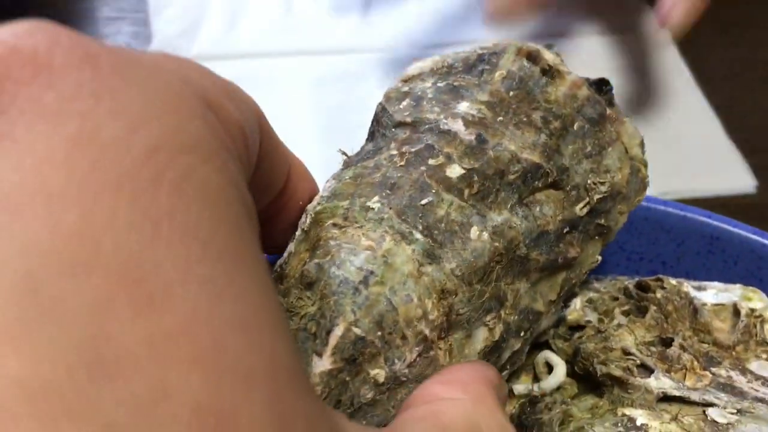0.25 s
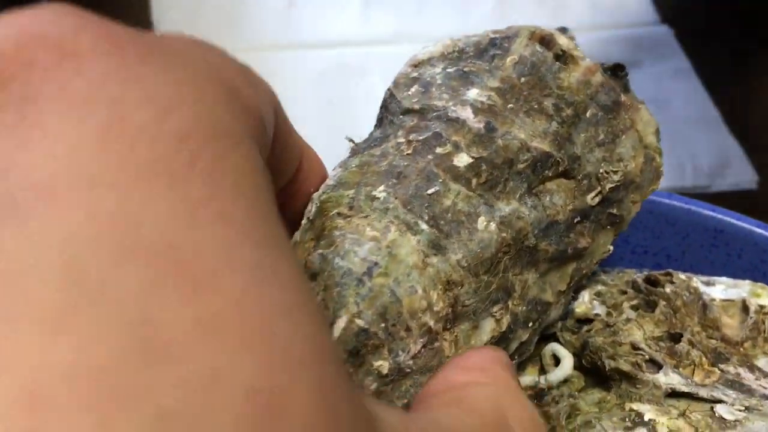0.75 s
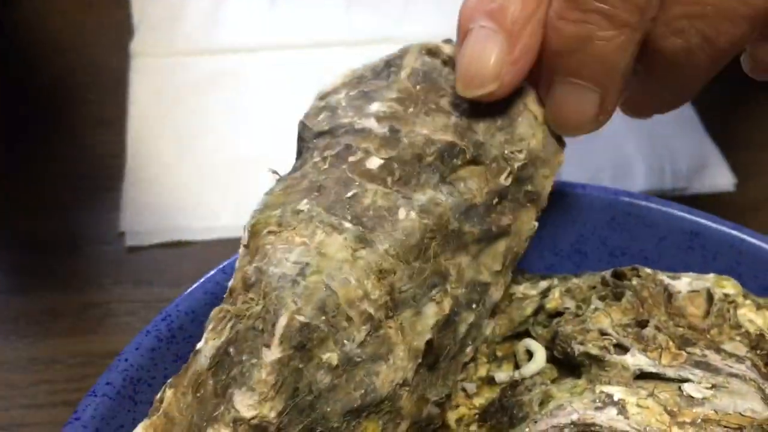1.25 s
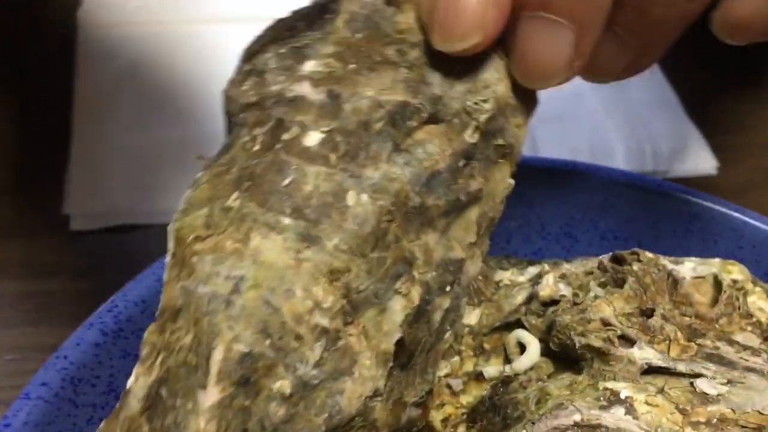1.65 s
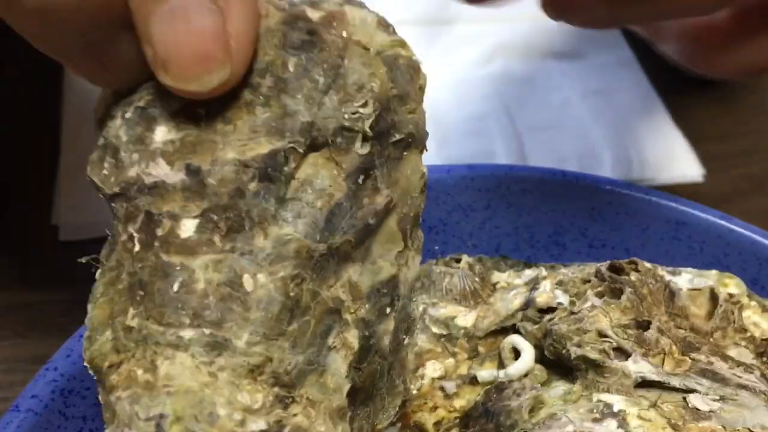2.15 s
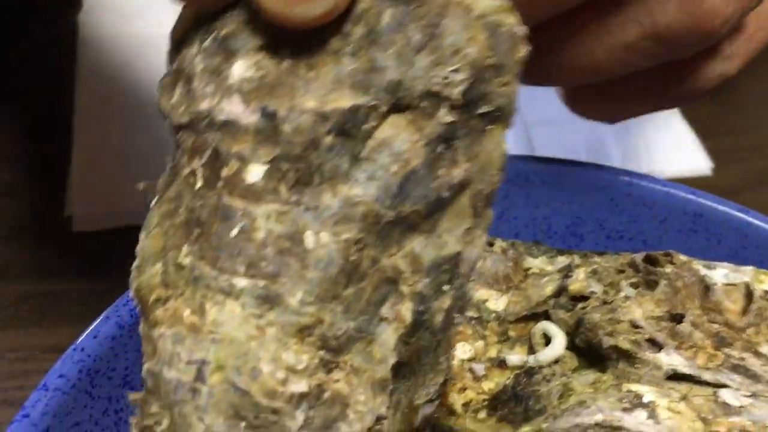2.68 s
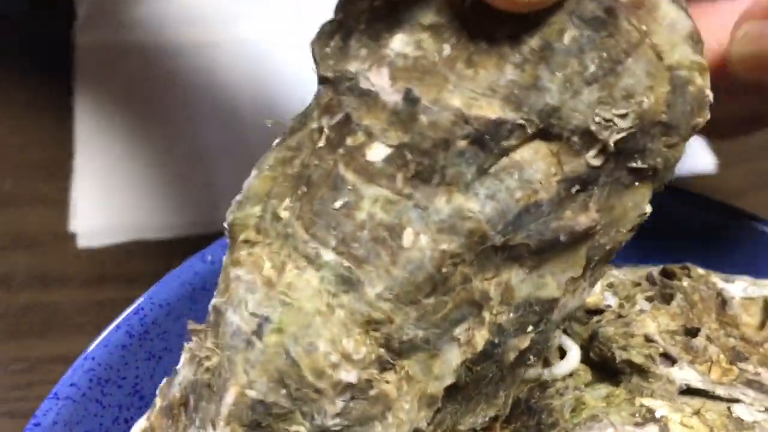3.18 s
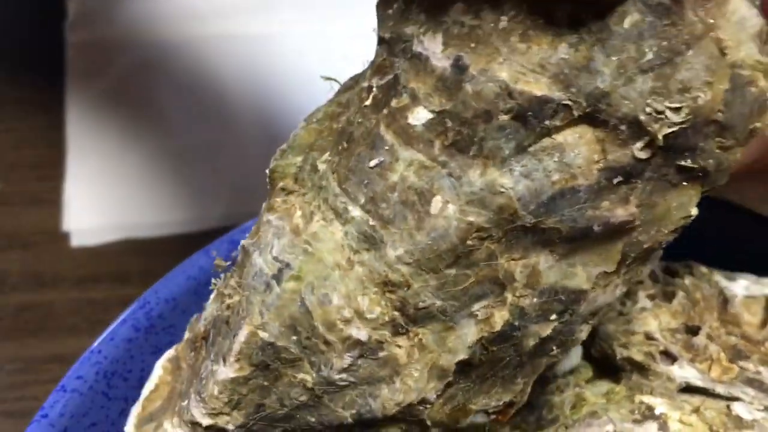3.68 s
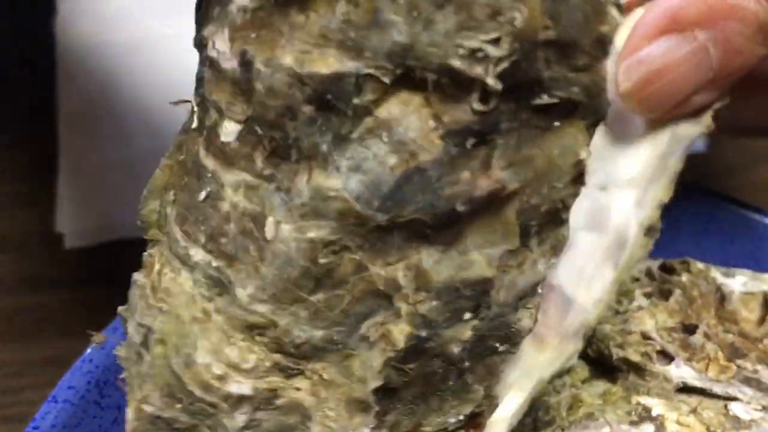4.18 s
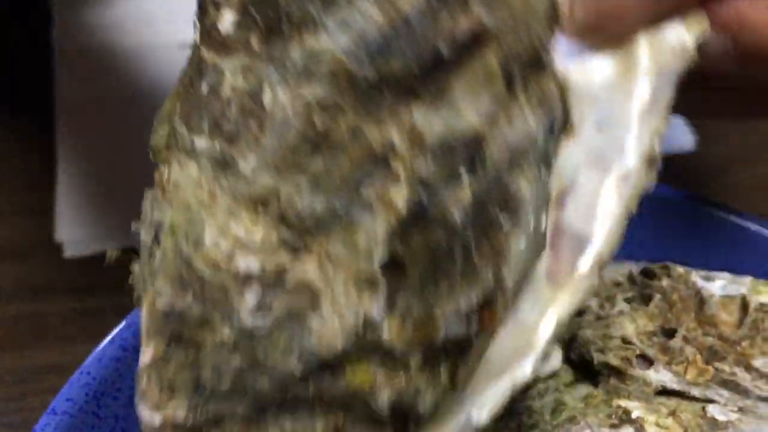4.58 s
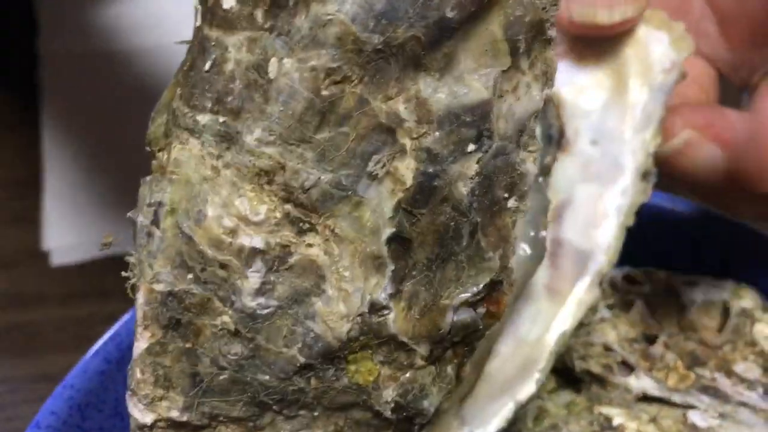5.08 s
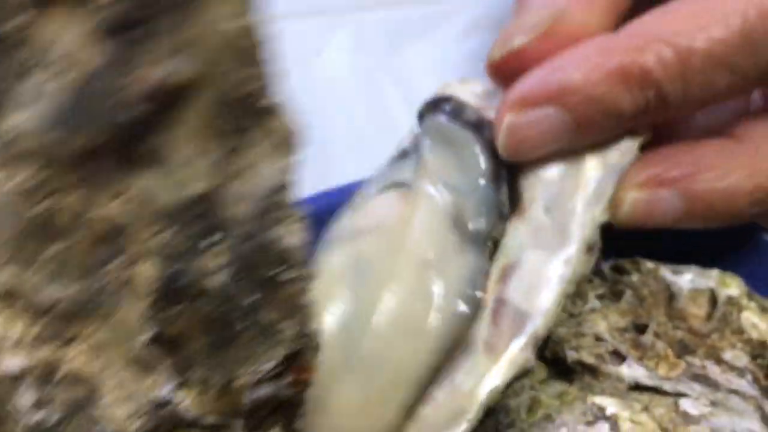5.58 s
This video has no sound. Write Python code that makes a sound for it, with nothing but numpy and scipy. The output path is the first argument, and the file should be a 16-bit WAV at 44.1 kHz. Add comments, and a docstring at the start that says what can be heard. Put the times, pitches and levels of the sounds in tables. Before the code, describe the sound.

Close, dry clacks and scratchy scrapes of heavy oyster shells, with sharp flaky clicks and soft wooden table thuds in a small quiet room.

```python
"""Prying an oyster on a plate

Hands turn and pry a large oyster that rests on other shells in a glazed plate, close to a small microphone.
The thick shell knocks dully (short dying tones), flakes of its rim tick (tone and noise bursts), and grit
scrapes (random tiny slips). The plate sings thinly and the wooden table answers with low thuds,
over a hand brushing paper (filtered noise that stops early) and the hush of a small room (steady noise)."""
import sys
import numpy as np
from scipy import signal
from scipy.fft import rfft, irfft, next_fast_len
from scipy.io import wavfile
from scipy.ndimage import uniform_filter1d

SR = 44100
rng = np.random.default_rng(int(sys.argv[2]) if len(sys.argv) > 2 else 0)


def to_wav(sig):
    """Store sig (one row per channel, or 1-D mono) as 16-bit WAV at the path in sys.argv[1].

    Samples outside -1..1 are clipped; the rate is SR.
    """
    pcm = np.clip(np.atleast_2d(sig), -1, 1) * 32767
    pcm = np.round(pcm).astype(np.int16)
    wavfile.write(sys.argv[1], SR, pcm.T)  # frames by channels


N = 257588  # length in samples

# Modes are the tones a body rings at. Columns: f/Hz, relative level/dB, time to fall by 60 dB/s
# the thick shell
SHELL_MODES = [(750, -2, 0.0061), (985, 7.5, 0.0099), (1140, 8.5, 0.009), (1523, 5.5, 0.015),
               (1839, 5.5, 0.012), (2355, -5, 0.022), (2903, -3, 0.0027), (4130, 1.5, 0.0062)]
# the glazed plate, same columns: f/Hz, relative level/dB, time to fall by 60 dB/s
PLATE_MODES = [(1955, -3, .05), (3590, -6, .08), (5075, -4, .05), (6750, -9, .06), (8670, -9, .05),
               (9910, -14, .06), (10820, -17, .09), (11890, -15, .06)]
# the wooden table top, same columns: f/Hz, relative level/dB, time to fall by 60 dB/s
TABLE_MODES = [(138, -1, 0.093), (192, -1, 0.075), (239.3, 13.5, 0.03), (283.5, 5, 0.044),
               (328.3, 1, 0.056)]

# fall in dB per octave squared above and below the struck spot's pitch, and its limit in dB
ABOVE_DB, BELOW_DB, FARTHEST_DB = 68, 25.5, 10.5
KNOCK_T60, SCRAPE_T60 = .015, .024  # s, ring time of the mode nearest the touched spot
HUSH_DB = -60  # average (rms) level
WIPE_END_S, WIPE_DB = 0.218, -61  # when the hand lifts, and the average level of its hiss
PUSH_HZ, PUSH_SPREAD = 203, 0.37  # pitch of a push on the table and its scatter in octaves
LOAD_DB, LOAD_SLOPE = -62, 0.84  # table drive in dB at -65 dB of drag, and dB gained per dB of drag
BITE_S, LET_GO_S = 0.0045, 0.014  # scrapes bite quickly and let go more slowly
FLUTTER_DB, FLUTTER_S = 3.5, 0.025  # rubbing flutters by this much, averaged over this time
GLAZE_DB = -19.5  # how much of the grit sets the plate singing
SPOT_S, SPOT_SHIFT = 0.05, .07  # time the grit stays on one spot of the rim, pitch scatter in octaves
# faint noise swelling just before each tick: level against its peak, time to rise 60 dB
LEAD_DB, LEAD_S = -14, .018
EDGE_HZ = 16300  # upper limit of the microphone's band


def gain_of(db):
    """Turns decibels into amplitude."""
    return 10 ** (np.asarray(db) / 20)


def evened(x):
    """Scales to an average (rms) level of 1."""
    return x / np.sqrt(np.mean(x ** 2) + 1e-20)


def peaked(x):
    """Scales to peak 1."""
    return x / (abs(x).max() + 1e-20)


def unit(x):
    """Scales a response to energy 1."""
    return x / np.linalg.norm(x)


def add(mix, s, sound):
    """Mixes a sound in at s seconds, or at the very start if s is negative."""
    part = mix[max(round(s * SR), 0):][:len(sound)]
    part += sound[:len(part)]


def filtered(x, order, hz, kind):
    """Passes x through a smooth filter that keeps only the high or band part."""
    return signal.sosfilt(signal.butter(order, hz, kind, fs=SR, output="sos"), x)


def coloured(x, points):
    """Shapes the spectrum of x by joining (Hz, dB) points with lines."""
    hz, db = np.transpose(points)
    size = next_fast_len(len(x))
    curve = np.interp(np.log(np.fft.rfftfreq(size, 1 / SR) + 1), np.log(hz + 1), db)
    return irfft(rfft(x, size) * gain_of(curve), size)[:len(x)]


def wander(smooth_s):
    """Random curve, averaged over smooth_s seconds and scaled to rms 1."""
    return evened(uniform_filter1d(rng.standard_normal(N), max(round(smooth_s * SR), 2)))


def ring(modes, extra_db=0, detune=1, rise_s=0.00016, count=6000):
    """A body struck once: a sum of sine tones that each die away exponentially."""
    hz, db, t60 = np.transpose(modes)[:, :, None]
    t = np.arange(count) / SR
    level = gain_of(db + np.reshape(extra_db, (-1, 1)) - 60 * t / t60)
    tones = level * np.sin(2 * np.pi * hz * np.reshape(detune, (-1, 1)) * t)
    return tones.sum(0) * (1 - np.exp(-t / rise_s))


def slips(per_s, spread_db, clump_s):
    """Rough surfaces stick and slip: random impulses of uneven size that come in clumps."""
    clumps = wander(clump_s)
    size = gain_of(spread_db * np.minimum(rng.exponential(1, N), 4)) * rng.choice([-1., 1.], N)
    return size * (rng.random(N) < per_s / SR * np.exp(.7 * clumps))


def near(spot_hz):
    """Shell modes weaken away from the favoured pitch, faster above it as the contact is blunt."""
    octaves = np.log2(np.transpose(SHELL_MODES)[0] / spot_hz)
    fall_db = np.where(octaves > 0, ABOVE_DB, BELOW_DB) * octaves ** 2
    return -np.minimum(fall_db, FARTHEST_DB)


def at_spot(spot_hz, spot_t60):
    """Shell modes excited at one spot: the nearest takes its pitch and ring time, the others weaken."""
    hz, db, t60 = np.transpose(SHELL_MODES)
    near_db = near(spot_hz)
    nearest = near_db == near_db.max()
    return np.transpose([np.where(nearest, spot_hz, hz), db + near_db, np.where(nearest, spot_t60, t60)])


def room_hush():
    """The hush of a small room: steady noise with a shaped spectrum."""
    # spectrum of the hush: f/Hz, relative level per Hz/dB
    hush_points = [(20, -3.5), (124, 5), (440, -15), (1350, -20), (1900, -16), (2890, -24), (4410, -24.5),
                   (13200, -28.5), (15600, -31), (16500, -72.5)]
    return gain_of(HUSH_DB) * evened(coloured(rng.standard_normal(N), hush_points))


def room(x):
    """Walls send back a short tail of sparse random echoes whose treble dies sooner."""
    t = np.arange(8000) / SR
    taps = rng.choice([-1., 1.], len(t)) * (rng.random(len(t)) < 2500 / SR) * (t > .003)
    dull = signal.lfilter([.3], [1, -.7], taps)
    bright = taps - dull
    tail = dull * gain_of(-60 * t / 0.16) + bright * gain_of(-60 * t / 0.13)
    return signal.oaconvolve(x, unit(tail))[:N]


def wipe():
    """A hand slides over a paper towel: a smooth wide hiss that stops as the hand lifts."""
    hiss = filtered(rng.standard_normal(N), 1, [900, 9000], "band")
    lift = np.clip((WIPE_END_S - np.arange(N) / SR) / 0.0095 + .5, 0, 1)
    return gain_of(WIPE_DB) * evened(hiss) * lift


def bumps():
    """A hand bumps the table, whose top swings softly at one low pitch."""
    # bumps: t/s, peak level/dB, f/Hz, time to fall by 60 dB/s
    bump_rows = [(0.757, -37, 69, 0.11), (4.672, -36, 63.6, 0.049)]
    out = np.zeros(N)
    for s, db, hz, t60 in bump_rows:
        add(out, s, gain_of(db) * peaked(ring([(hz, 0, t60)], rise_s=0.022)))
    return out


def thuds():
    """Blows pass through the plate: a quickly dying low push, joined by the table top's ringing."""
    # thuds in the table: t/s, peak level/dB
    thud_rows = [(0.177, -37), (0.447, -43), (0.648, -32.5), (0.877, -23.5), (0.906, -16), (0.963, -30),
                 (1.094, -24), (1.219, -27.5), (1.545, -31), (1.937, -34), (2.005, -19), (2.1, -39),
                 (2.254, -32.5), (3.154, -29), (3.488, -33.5), (3.63, -32.5), (3.905, -36), (4.3, -29),
                 (4.344, -40), (4.384, -30), (4.397, -28), (5.15, -27.5), (5.434, -20.5), (5.553, -23.5),
                 (5.828, -30)]
    out, t = np.zeros(N), np.arange(6000) / SR
    chance = rng.standard_normal((len(thud_rows), len(TABLE_MODES) + 1))
    for (s, db), c in zip(thud_rows, chance):
        hz = PUSH_HZ * 2 ** (PUSH_SPREAD * c[-1])
        push = np.sin(2 * np.pi * hz * t) * (t / .003) * np.exp(-t / 0.0024)
        table = ring(TABLE_MODES, 2 * c[:-1], rise_s=0.0093)
        add(out, s, gain_of(db) * peaked(peaked(push) + gain_of(-0.5) * peaked(table)))
    return out


def plate():
    """Blows that reach the bare glaze make the plate ring with thin glassy tones."""
    # ringing blows: t/s, level added to the plate's modes/dB
    chime_rows = [(.905, -27), (.919, -32.5), (1.216, -51), (2.009, -38.5), (2.097, -39), (3.152, -38.5),
                  (3.183, -58), (5.547, -38), (5.825, -39)]
    out = np.zeros(N)
    chance = rng.standard_normal((len(chime_rows), len(PLATE_MODES)))
    for (s, db), c in zip(chime_rows, chance):
        add(out, s, gain_of(db) * ring(PLATE_MODES, 2 * c))
    return out


def on_rim(drive, count=8):
    """The contact jumps between spots of the uneven thin rim, each ringing at its own pitches."""
    # modes of the thin rim: f/Hz, relative level/dB, time to fall by 60 dB/s
    rim_modes = [(3350, 3, 0.008), (4300, 1, 0.006), (5350, 4, 0.009), (6850, 1, 0.006), (8770, 0, 0.004),
                 (12060, -3, 0.004)]
    hold = max(round(SPOT_S * SR), 2)
    spot = np.repeat(rng.integers(0, count, N // 100), hold)[:N]
    shifts = 2 ** (SPOT_SHIFT * np.clip(rng.standard_normal((count, len(rim_modes))), -2, 2))
    out = np.zeros(N)
    for k, shift in enumerate(shifts):
        response = unit(ring(rim_modes, 0, shift, rise_s=.00005, count=600))
        out += signal.oaconvolve(drive * (spot == k), response)[:N]
    return out


def rubbing():
    """Slips under slow rubbing and short scrapes drive table and shell; grit excites plate and rim."""
    # slow rubbing, joined by lines: t/s, shell drag level/dB, grit level/dB (both before flutter)
    rub_rows = [(0.0, -64, -73), (0.23, -75, -77), (0.86, -67, -67), (1.06, -61.5, -61), (1.27, -74, -69),
                (1.93, -60.5, -62.5), (2.289, -77, -74.5), (2.64, -60.5, -68), (2.93, -59.5, -72),
                (3.28, -63, -68.5), (3.92, -60.5, -56), (4.18, -87.5, -73.5), (4.981, -70.5, -66.5),
                (5.3, -52, -64.5), (5.55, -60.5, -60), (5.8, -58, -55.5)]
    # scrapes of shell on shell: t/s, nominal length/s, shell drag level/dB, grit level/dB, favoured f/Hz
    scrape_rows = [(0.825, 0.037, -54.5, -64, 1650), (0.873, 0.021, -32.5, -42, 750),
                   (1.161, 0.052, -47, -58, 1940), (1.528, 0.018, -75, -52, 1900),
                   (1.64, 0.048, -60.5, -63, 1890), (1.712, 0.039, -53.5, -64, 1900),
                   (1.872, 0.06, -57, -67, 1870), (1.926, 0.069, -47.5, -58, 1990),
                   (2.028, 0.0086, -42.5, -51, 1880), (2.092, 0.027, -45, -45.5, 1140),
                   (2.238, 0.059, -48, -59, 1145), (2.612, 0.0051, -49, -48, 1540),
                   (2.66, 0.043, -61, -65, 1860), (2.714, 0.085, -49, -57, 1825),
                   (2.793, 0.099, -61, -59, 1700), (3.007, 0.076, -47.5, -53.5, 1707),
                   (3.06, 0.045, -55.5, -57, 1170), (3.149, 0.064, -44.5, -53, 1046),
                   (3.425, 0.031, -54, -52.5, 1365), (3.471, 0.0032, -39.5, -34.5, 940),
                   (3.608, 0.028, -46, -46, 1480), (3.65, 0.0098, -47, -50, 1840),
                   (3.762, 0.034, -54.5, -57, 1020), (4.125, 0.026, -60, -53, 1630),
                   (4.252, 0.055, -88, -54.5, 796), (4.299, 0.048, -46, -55.5, 820),
                   (4.348, 0.038, -38, -45.5, 1090), (4.727, 0.069, -67, -57.5, 1703),
                   (5.144, 0.015, -36, -51, 1130), (5.19, 0.039, -63, -88, 1010),
                   (5.456, 0.031, -45.5, -49, 860), (5.487, 0.077, -41, -48, 883),
                   (5.518, 0.098, -48, -60, 900), (5.558, 0.026, -45.5, -65, 1020),
                   (5.682, 0.031, -43, -51, 1830)]
    s, *columns = np.transpose(rub_rows)
    drag_curve, grit_curve = (np.interp(np.arange(N) / SR, s, c) for c in columns)
    jolts = evened(slips(1500, 3.2, 0.006))
    flutter = gain_of(FLUTTER_DB * wander(FLUTTER_S))
    drag, grit = gain_of(drag_curve) * flutter, gain_of(grit_curve) * flutter
    scratch, pressing = np.zeros(N), drag.copy()
    out = signal.oaconvolve(jolts * drag, unit(ring(SHELL_MODES, count=2500)))[:N]

    for start, length, drag_db, grit_db, spot_hz in scrape_rows:
        t = np.arange(0, length + LET_GO_S / 2, 1 / SR)
        bite = np.minimum(t / BITE_S, 1)
        let_go = np.minimum((t[-1] - t) / min(LET_GO_S, length), 1)
        first = round(start * SR)
        stroke = bite * let_go
        stroke = stroke * flutter[first:][:len(stroke)]
        drive = jolts[first:][:len(stroke)] * stroke * gain_of(drag_db)
        shell = unit(ring(at_spot(spot_hz, SCRAPE_T60), count=2500))
        add(out, start, signal.oaconvolve(drive, shell))
        add(pressing, start, gain_of(drag_db) * stroke)
        add(scratch, start, gain_of(grit_db) * stroke)

    # the load on the table follows the pressure
    load = gain_of(LOAD_DB) * (pressing / gain_of(-65.0)) ** LOAD_SLOPE
    table = unit(ring(TABLE_MODES, rise_s=0.0063))
    out += signal.oaconvolve(evened(slips(500, 3.0, 0.039)) * load, table)[:N]

    grains = evened(slips(2200, 2.6, 0.005))
    fine = grains * (grit + scratch)
    # sparser, larger crumbs are strongest while scraping
    scraping = scratch + .5 * grit
    crumbs = evened(slips(400, 4.5, .012)) * scraping
    out += gain_of(GLAZE_DB) * signal.oaconvolve(fine + crumbs, unit(ring(PLATE_MODES)))[:N]
    out += on_rim(gain_of(-4) * grains * scraping + gain_of(-3) * crumbs)
    direct = filtered(fine + 0.28 * crumbs, 1, [2500, 12000], "band")
    return out + gain_of(-1.5) * direct


def ticks():
    """A brittle flake snaps: a brief tone inside a quickly dying burst of bright noise."""
    # ticks of the flaky rim: t/s, peak level/dB, flake f/Hz, treble snap level against the flake tone/dB
    tick_rows = [(0.0093, -27, 3180, -5), (0.829, -35, 5330, -15), (0.904, -18, 4730, -18),
                 (0.917, -19.5, 5070, -17), (1.051, -31, 5440, -20), (1.091, -24.5, 3580, -11),
                 (1.1423, -31.5, 5660, -16), (1.253, -43, 4940, 2), (1.4138, -41, 3200, 4),
                 (1.914, -36.5, 6150, -11), (1.9376, -23, 3430, -23), (1.984, -33.5, 7050, 11),
                 (2.009, -31, 5080, -30), (2.098, -34, 5920, -12), (2.2544, -37, 9500, -16),
                 (2.2807, -27, 4120, -1), (2.359, -37.5, 9570, 4), (2.441, -39.5, 9300, 16),
                 (2.677, -38, 3760, -6), (2.8194, -35, 3670, -31), (2.894, -36.5, 12050, -20),
                 (2.913, -37.5, 5140, -10), (2.9544, -35, 12100, -19), (2.976, -34.5, 4300, 8),
                 (3.01, -46, 4500, 1), (3.032, -30.5, 4300, 4), (3.0563, -7, 4180, 9.5),
                 (3.066, -13, 4180, 6), (3.076, -22, 6800, -9), (3.184, -32, 3820, -23),
                 (3.3439, -33.5, 5200, -11), (3.434, -37, 5340, -14), (3.478, -25, 3300, -13),
                 (3.5383, -34, 4060, -22), (3.622, -29, 4130, -26), (3.732, -36.5, 6950, -13),
                 (3.789, -33.5, 6870, -9), (3.818, -29.5, 2860, -12), (3.844, -33, 6900, 7),
                 (3.87, -42.5, 4250, -21), (3.886, -37.5, 5900, -12), (3.916, -26.5, 5970, 2),
                 (3.963, -35.5, 5100, 0), (4.023, -49.5, 4200, -3), (4.0615, -21.5, 5770, -13),
                 (4.342, -31, 3800, -15), (4.3507, -29, 4600, -2), (4.534, -39.5, 4330, 5),
                 (4.678, -33.5, 5600, 1), (4.775, -26.5, 5900, 16), (4.868, -44, 5440, -18),
                 (4.933, -41.5, 5570, -19), (5.018, -31.5, 4380, -3), (5.0582, -23.5, 5360, -16),
                 (5.072, -26, 5650, -35), (5.0933, -23.5, 5340, -26), (5.099, -26, 5380, -35),
                 (5.1402, -40, 5500, -10), (5.1479, -20, 5420, -24), (5.2786, -28.5, 5470, -22),
                 (5.3228, -32.5, 5470, -16), (5.43, -30.5, 3060, -18), (5.46, -15, 9700, 16),
                 (5.47, -24, 7400, -6), (5.492, -25.5, 5430, -5), (5.515, -30, 8850, -8),
                 (5.561, -27.5, 3250, -33), (5.617, -34, 3160, -14), (5.626, -25.5, 6080, -14),
                 (5.661, -30, 5670, -31), (5.6887, -31, 5900, -45), (5.71, -33, 3860, -23),
                 (5.737, -43, 6250, -22), (5.8256, -31.5, 3550, -38)]
    out, t = np.zeros(N), np.arange(700) / SR
    noise = rng.standard_normal((len(tick_rows), 2, len(t)))
    start = 1 - np.exp(-t / 0.00067)
    burst = np.exp(-(t / 0.0011) ** 0.79)
    for (s, db, hz, snap_db), (a, b) in zip(tick_rows, noise):
        flake = np.sin(2 * np.pi * hz * t) * gain_of(-60 * (t / 0.0086) ** 1.23)
        # flakes with a strong snap crunch more, the others ring clearer
        crunch_gain = gain_of(6.0 + 0.35 * snap_db)
        crunch = evened(filtered(a, 1, [2000, 8500], "band")) * crunch_gain * burst
        snap = evened(filtered(b, 2, 8500, "high")) * gain_of(snap_db) * burst
        add(out, s, gain_of(db) * peaked((flake + crunch + snap) * start))
        lead_rise = gain_of(db + LEAD_DB - 60 * t[::-1] / LEAD_S)
        add(out, s - t[-1], lead_rise * peaked(filtered(b, 1, [2000, 8500], "band")))
    return out


def knocks():
    """Each blow is a few quick contacts that excite the shell modes near the struck spot's pitch."""
    # knocks of the thick shell: t/s, peak level before the bass cut/dB, pitch of the struck spot f/Hz
    knock_rows = [(0.21, -34.5, 1005), (0.6468, -24.5, 1616), (0.6579, -30, 1460), (0.879, -18, 1810),
                  (0.908, -10.5, 1820), (0.9195, -5, 1040), (0.9612, -31, 1100), (0.986, -31.5, 830),
                  (1.0918, -15, 763), (1.0969, -24.5, 820), (1.1432, -25.5, 1890), (1.217, -37, 1160),
                  (1.252, -37, 956), (1.414, -52.5, 1050), (1.5446, -25.5, 1140), (1.94, -18, 1270),
                  (2.0, -16, 945), (2.008, -6, 1140), (2.101, -30, 1140), (2.255, -28.5, 1650),
                  (2.266, -31.5, 1540), (2.676, -32.5, 1640), (2.82, -36.5, 1100), (2.95, -34, 1130),
                  (2.979, -44, 1900), (3.042, -24, 1960), (3.056, -17, 1820), (3.0743, -31, 930),
                  (3.1524, -11.5, 1590), (3.1524, -20.5, 2450), (3.165, -30, 1080), (3.198, -32, 1140),
                  (3.259, -36, 1070), (3.32, -30.5, 920), (3.349, -30, 903), (3.382, -26, 860),
                  (3.483, -26.5, 1016), (3.5392, -22, 1590), (3.562, -31, 920), (3.847, -36, 1190),
                  (3.911, -31, 1980), (4.2984, -21.5, 880), (4.3529, -24.5, 1390), (4.359, -17, 846),
                  (4.3696, -27, 940), (4.3854, -20, 793), (5.0225, -28.5, 780), (5.059, -30, 935),
                  (5.1555, -34.5, 940), (5.255, -35.5, 1380), (5.306, -44, 1000), (5.3992, -29, 902),
                  (5.414, -36, 960), (5.4343, -17.5, 1006), (5.547, -20.5, 1980), (5.5615, -12.5, 900),
                  (5.695, -32, 2020), (5.713, -33, 990), (5.8246, -23.5, 1180), (5.826, -18, 2310)]
    out = np.zeros(N)
    chance = rng.standard_normal((len(knock_rows), 3, len(SHELL_MODES)))
    for (s, db, spot_hz), c in zip(knock_rows, chance):
        detune = 1 + .015 * c[1]  # the grip shifts the modes a little
        # the first of four contacts comes at once, the others at random short delays
        delays = abs(c[2, :4]) * [0, 1, 1, 1] * 0.001327 * SR
        contacts = np.zeros(200)
        np.add.at(contacts, np.minimum(delays, 199).astype(int), 0.69 ** np.arange(4))
        shell = ring(at_spot(spot_hz, KNOCK_T60), 2 * c[0], detune, rise_s=0.00034, count=2500)
        add(out, s, gain_of(db) * peaked(signal.oaconvolve(shell, contacts)))
    return filtered(out, 2, 600, "high")  # a small shell radiates little bass


def scene():
    """Shells, plate and table with the room's tail, over steady hush."""
    close = knocks() + plate() + thuds() + rubbing()
    brief = ticks()  # so short that they get no room tail
    tail = gain_of(-16.5) * room(close)
    return (close + brief + tail + bumps() + wipe() + room_hush())[None]


def record(dry):
    """The small microphone loses the deepest bass, rounds the highest peaks and cuts the top treble."""
    thin = filtered(dry, 2, 55, "high")
    rounded = .45 * np.tanh(thin / .45)
    band_limit = signal.firwin(511, EDGE_HZ, window=("kaiser", 9), fs=SR)
    return signal.oaconvolve(rounded, band_limit[None], "same")


dry = scene()
out = record(dry)
to_wav(out)
```